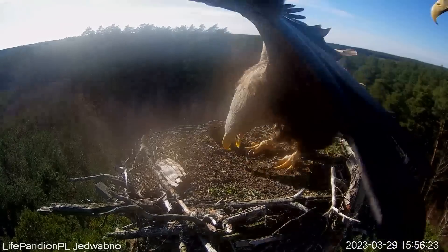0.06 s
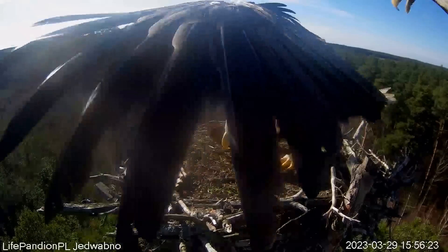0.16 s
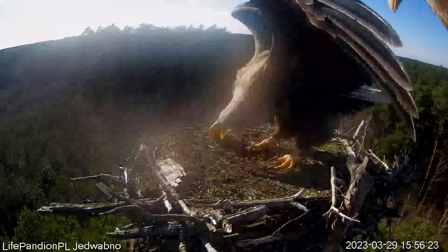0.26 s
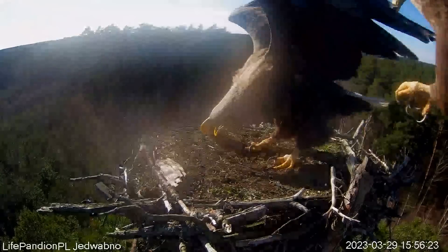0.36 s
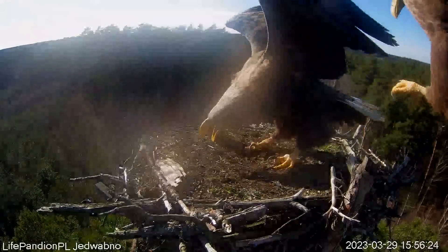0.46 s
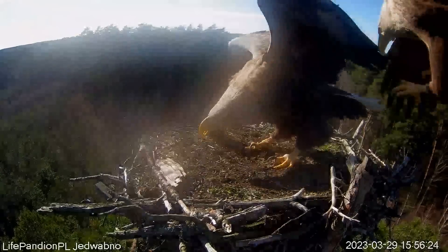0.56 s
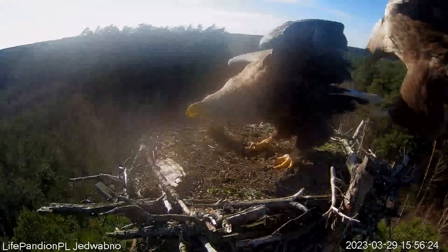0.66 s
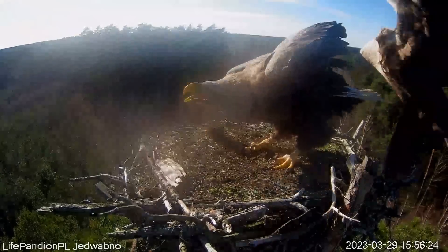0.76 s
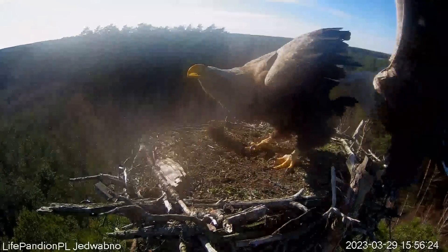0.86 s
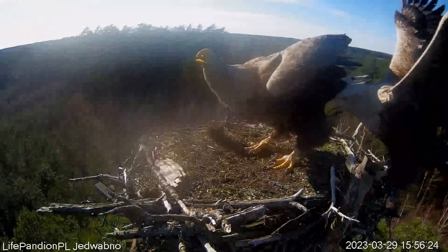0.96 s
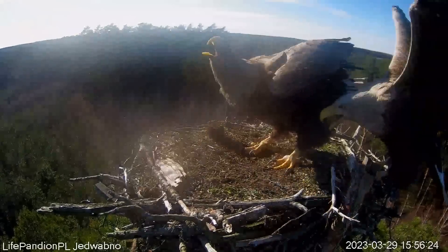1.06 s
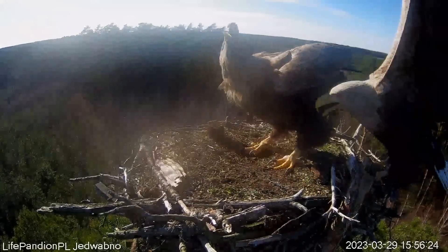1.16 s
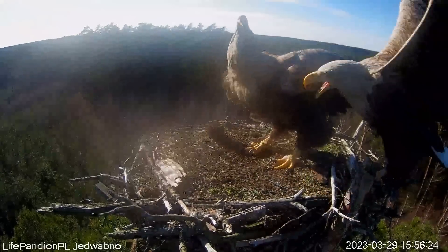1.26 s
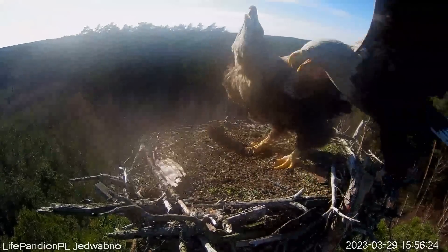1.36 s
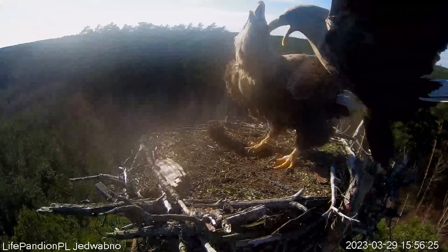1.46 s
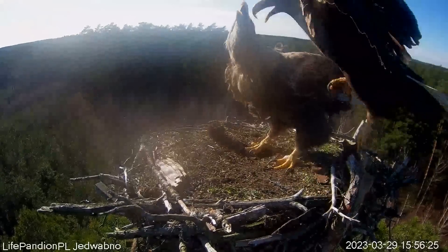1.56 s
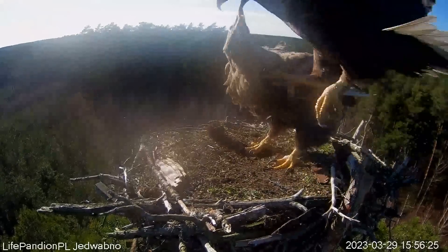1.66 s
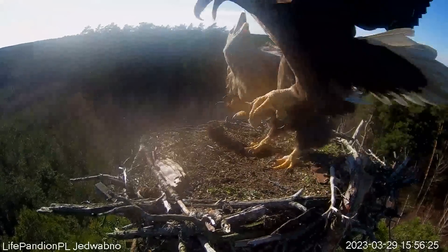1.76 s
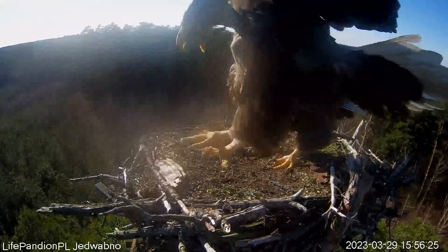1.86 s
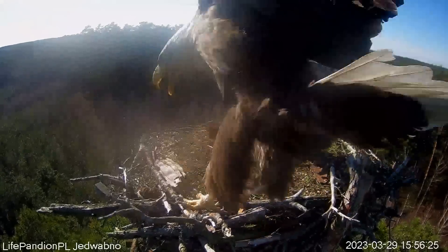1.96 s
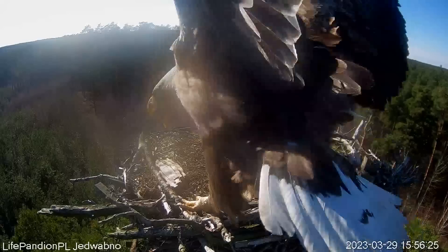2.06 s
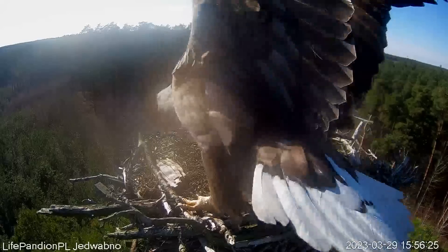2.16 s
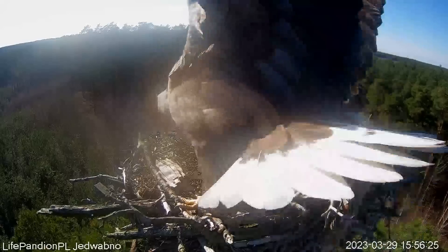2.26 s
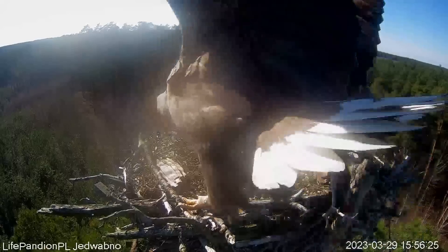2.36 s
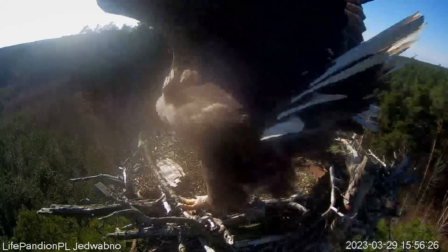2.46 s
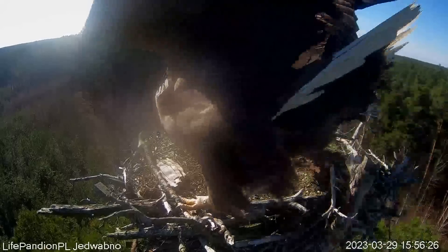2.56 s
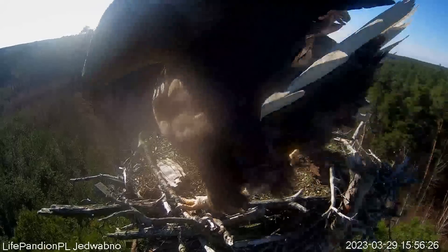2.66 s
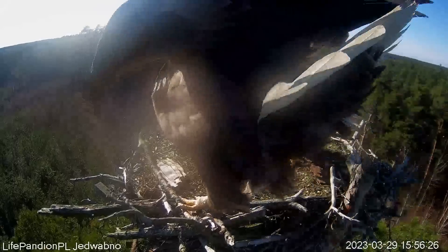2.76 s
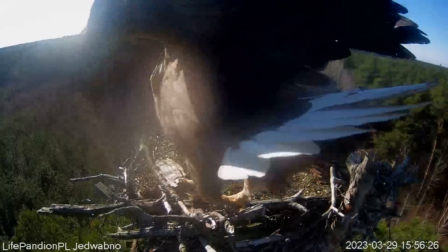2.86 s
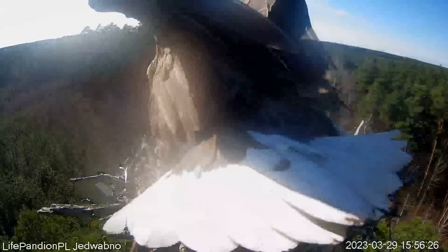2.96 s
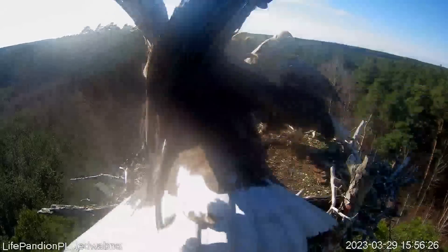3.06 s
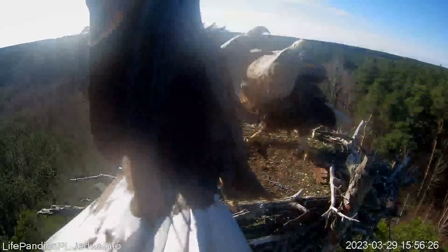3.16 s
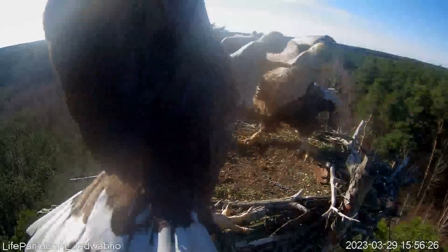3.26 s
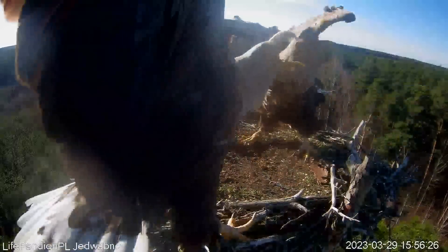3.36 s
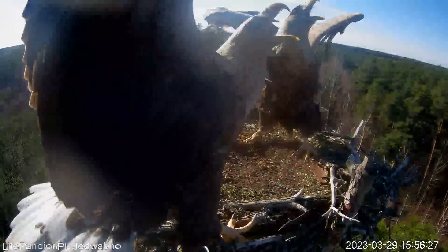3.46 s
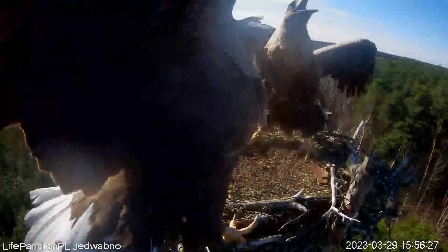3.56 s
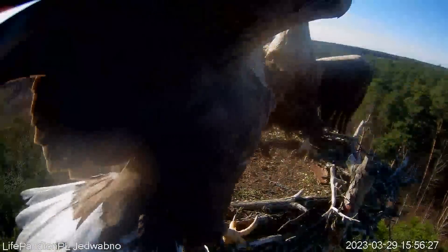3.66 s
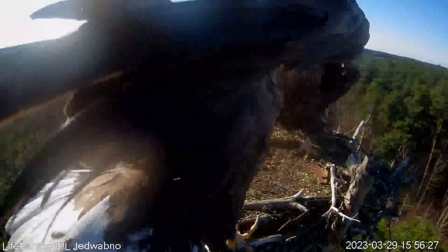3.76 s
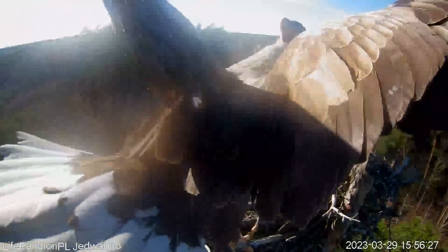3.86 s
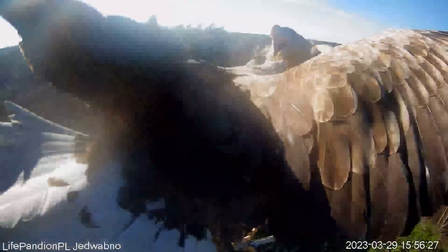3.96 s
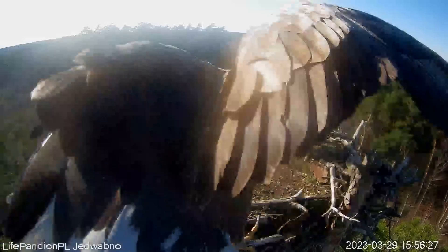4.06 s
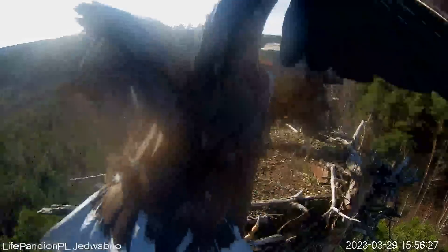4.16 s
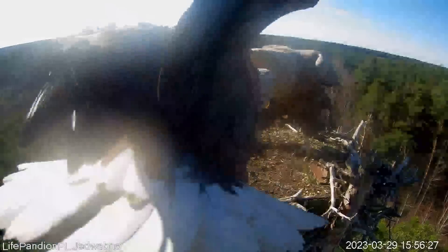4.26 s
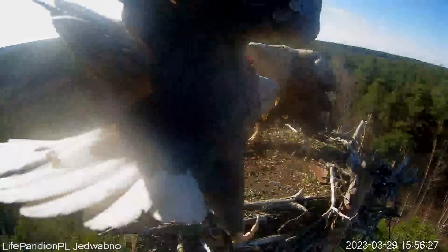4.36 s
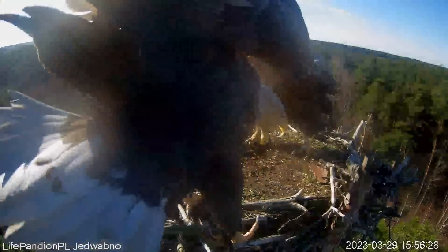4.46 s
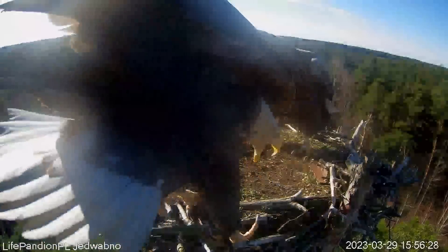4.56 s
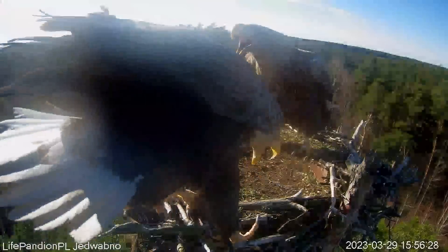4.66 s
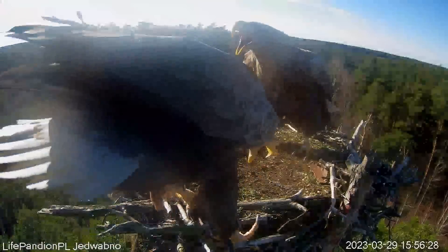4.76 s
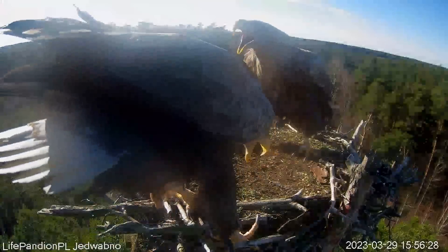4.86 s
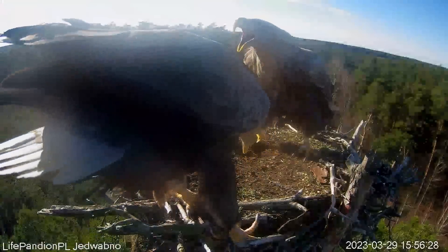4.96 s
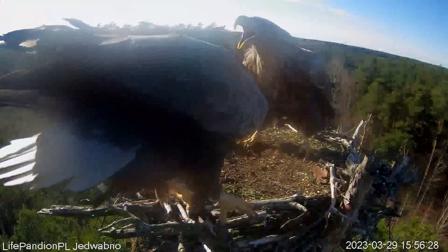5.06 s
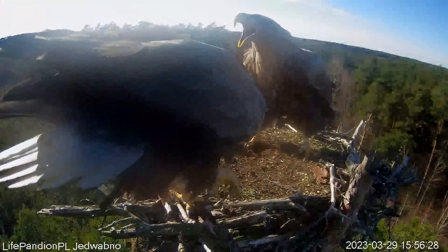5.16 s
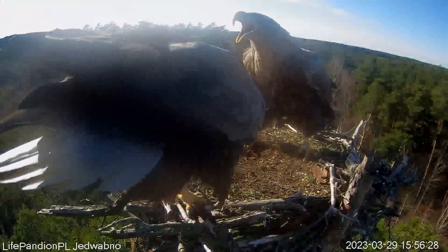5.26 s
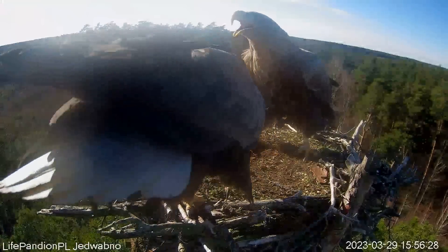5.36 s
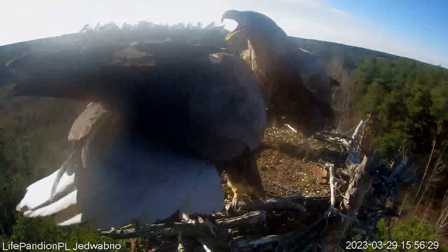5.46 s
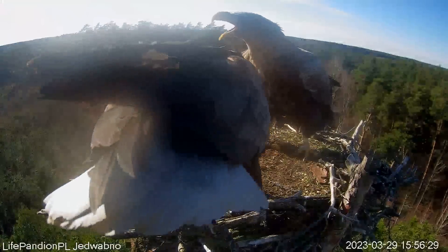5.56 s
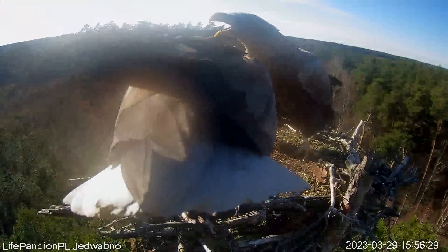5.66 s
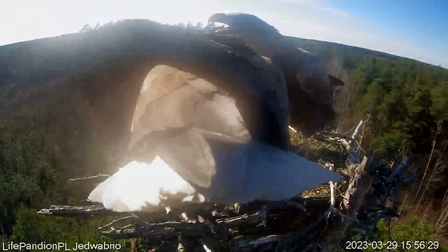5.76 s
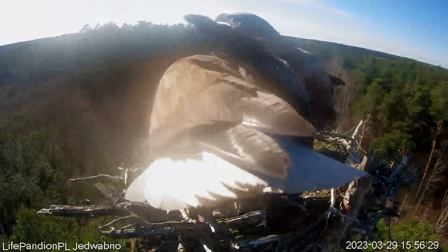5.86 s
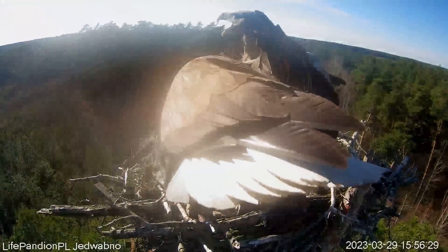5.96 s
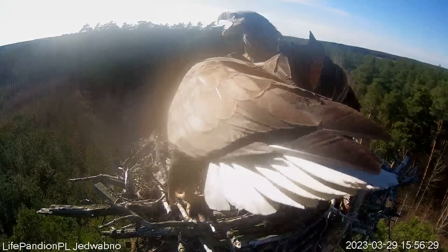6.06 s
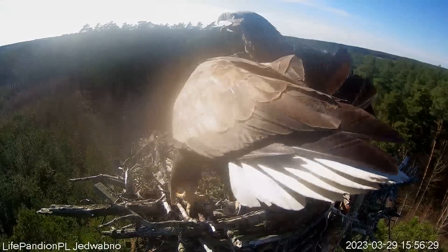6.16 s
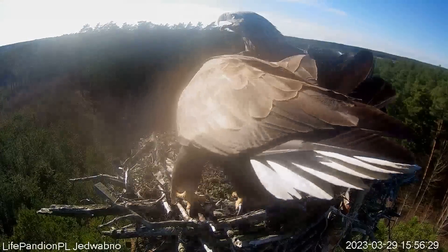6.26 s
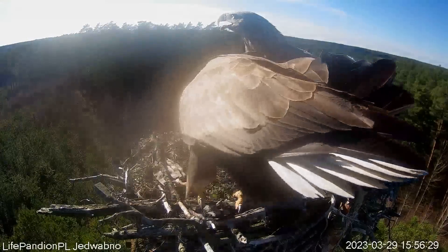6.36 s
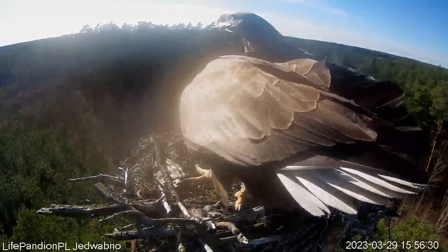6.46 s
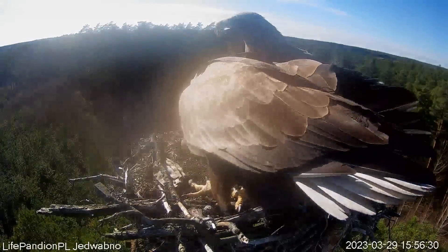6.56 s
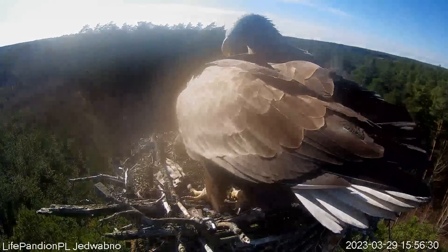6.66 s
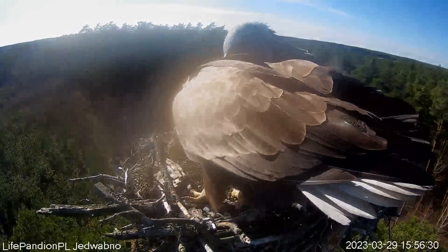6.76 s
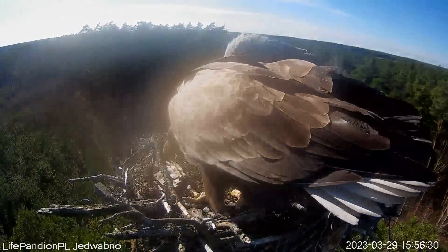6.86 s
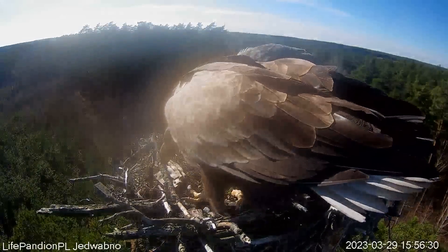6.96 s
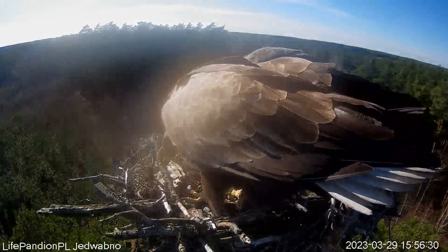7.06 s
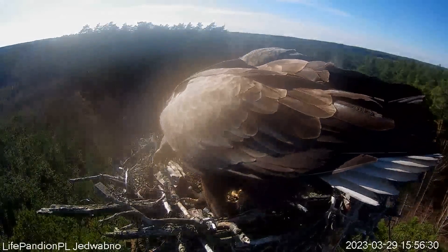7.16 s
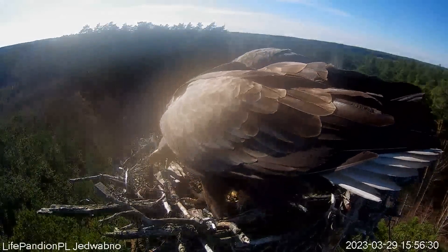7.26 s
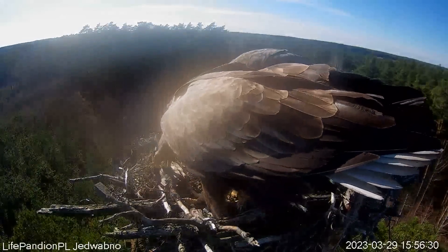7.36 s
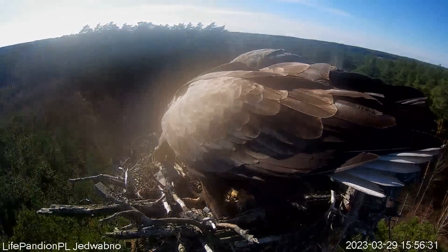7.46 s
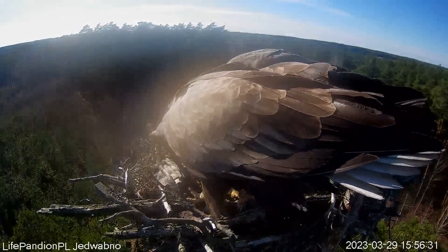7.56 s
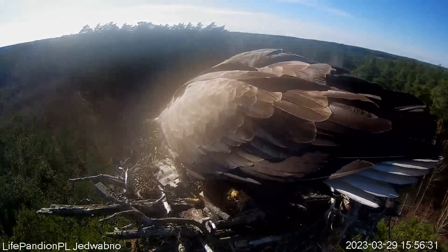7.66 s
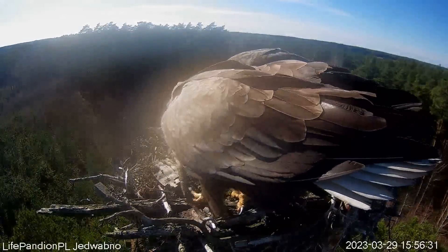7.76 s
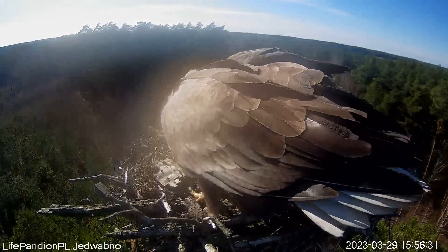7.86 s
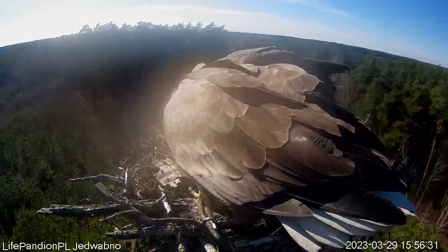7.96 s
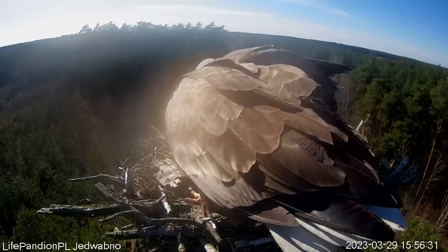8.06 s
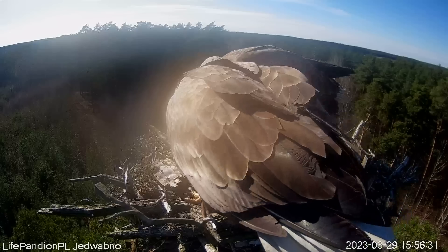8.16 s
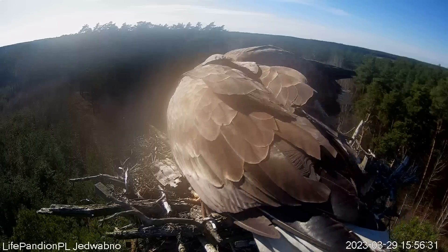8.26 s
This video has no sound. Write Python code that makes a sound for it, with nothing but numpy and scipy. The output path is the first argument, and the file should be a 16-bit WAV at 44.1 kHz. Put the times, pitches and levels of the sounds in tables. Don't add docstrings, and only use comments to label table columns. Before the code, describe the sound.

Close, harsh and slightly overloaded yelping from two large birds of prey, outdoors high above a forest. Arched cries repeat about five times a second, interleaved with higher notes that crack upward, throat rattles and hard bill snaps. Low puffs of air buffet the microphone, twigs knock its mount and feathers brush nearby. Faint echoes return from the trees; the calling then stops, leaving sparse, gentle cries and dwindling wind.

```python
import sys
import numpy as np
from scipy import signal
from scipy.io import wavfile
from scipy.ndimage import uniform_filter1d

SR = 44100
rng = np.random.default_rng(int(sys.argv[2]) if len(sys.argv) > 2 else 0)


def generate_wav(sig):
    pcm = np.round(np.clip(np.atleast_2d(sig).T, -1, 1) * 32767).astype(np.int16)
    wavfile.write(sys.argv[1], SR, pcm)


def magnitude_from_level(level_db):
    exponent = np.asarray(level_db, float) / 20
    return 10 ** exponent


N = 365588


def band(x, lo_hz, hi_hz, order=2):
    return signal.sosfilt(signal.butter(order, [lo_hz, hi_hz], "band", fs=SR, output="sos"), x)


def unit(x):
    return x / np.sqrt(np.mean(x ** 2))


def walk(rate, size=N):
    k = int(SR / rate)
    held = np.repeat(rng.standard_normal(size // k + 1), k)
    return 1.64 * uniform_filter1d(uniform_filter1d(held, k), k)[:size]


def add(out, s, x):
    i = int(s * SR)
    out[i:i + len(x)] += x[:N - i]


def spans(table, edge_s):
    gain = np.zeros(N)
    for t0, t1, db in table:
        gain[int(t0 * SR):int(t1 * SR)] = magnitude_from_level(db)
    return uniform_filter1d(gain, int(edge_s * SR))


# (frequency [Hz], level [dB])
THROAT_COLOUR = [(500, -23.5), (1200, -1.5), (2400, 1), (3600, -3.5), (5000, -6.5), (7500, -4)]


def syrinx(hz, level_db, open_db, half_db, unrest, wobble=.006, shimmer_db=0.6):
    size = len(hz)
    peak_db = np.max(level_db)
    drive = peak_db / 10 + 2
    kink = .008 * np.clip(drive, .2, 1)
    drift = unrest * wobble * walk(300, size=size) + kink * walk(100, size=size)
    phase = 2 * np.pi * np.cumsum(hz * (1 + drift)) / SR
    order = np.arange(1, 15)[:, None] / 2

    slope_db = 0.084 * open_db + 0.21 * level_db - 5.5
    db = np.where(order <= 2, open_db * (order - 1), open_db + (order - 2) * slope_db)
    db = np.where(order % 1 > 0, half_db + np.minimum(db, 0) * (order > 1), db)
    sway = np.array([walk(150, size=size) for _ in order])
    db = db + 1.7 * (np.clip(order, 1, 5) - .6) * sway
    db = db - .25 * np.maximum(order - 2, 0) * (peak_db - level_db)
    throat_hz, throat_db = np.transpose(THROAT_COLOUR)
    gain = magnitude_from_level(db + np.interp(np.log(order * hz), np.log(throat_hz), throat_db))
    gain = gain * (order * hz < 9000)

    lag = np.pi / 4 * np.clip(drive, 0, 1) * order ** 2
    lag = lag + .09 * np.minimum(unrest, 3) * np.maximum(order - 2.5, 0) * walk(1200, size=size)
    tone = -np.sum(gain * np.cos(order * phase + lag), axis=0)
    tone = tone / np.sqrt(np.sum(gain ** 2, axis=0) / 2)
    shimmer = 0.4 * walk(90, size=size) - shimmer_db * unrest * np.abs(walk(250, size=size))
    tone = tone * magnitude_from_level(level_db + shimmer)

    hoarse_db = -19.5 + 1.6 * np.maximum(level_db, -20) + 6 * walk(200, size=size)
    shake = np.minimum(magnitude_from_level(hoarse_db) * unrest, .7) * walk(2500, size=size)
    return tone + band(tone * shake, 1100, 5000, order=3)


LEAD_S, RELEASE_S = .006, .008
# (time inside the note [s], level of half-pitch partials [dB])
DOUBLED_NOTES = [
    (1.11, -10),
    (1.34, -27),
    (5.31, -12),
    (5.83, -9.5),
    (7.19, -29),
    (7.5, 8.5),
]


def sing(s, hz, swell_db, level_db, open_db):
    lead = int(LEAD_S * SR)
    hz, swell_db, open_db = (np.pad(v + 0 * hz, (lead, 0), mode="edge") for v in (hz, swell_db, open_db))
    t = np.arange(len(hz)) / SR
    left = t[-1] - t
    half_db = max([d for at, d in DOUBLED_NOTES if s < at < s + t[-1]], default=-45)
    attack = np.clip(1 - t / 0.017, 0, 1) ** 1.5
    release = np.clip(1 - left / RELEASE_S, 0, 1) ** 2
    swell_db = swell_db - 29.5 * (attack + release)
    fade = np.clip(np.minimum(t / 2, left) / .003, 0, 1)
    strain = .75 + 1.8 * np.exp(-((s - 3.9) / 1.0) ** 2)
    unrest = strain + 5 * np.exp(-((t - LEAD_S) / .018) ** 2) - .15 * swell_db
    half_db = np.maximum(half_db, np.minimum(-50 + 6 * unrest, -10))
    voice = fade * syrinx(hz, level_db + swell_db, open_db, half_db, unrest)
    return max(s - LEAD_S, 0), voice[max(lead - int(s * SR), 0):]


def bill_opening(hz):
    return 2 - 18 * np.maximum(hz - 1300, 0) / 1000


# (start [s], length [s], pitch from [Hz], pitch to [Hz], level [dB])
ONE_REGISTER_GLIDES = [(0, 0.03, 1273, 1163, -6.5), (1.095, 0.04, 1078, 1150, -14),
                       (2.631, 0.038, 1690, 1670, -20.5), (2.832, 0.039, 1775, 1750, -17),
                       (3.053, 0.047, 1790, 1800, -12), (3.236, 0.047, 1190, 1215, -14),
                       (3.274, .052, 1720, 1810, -5), (3.473, .062, 1543, 1985, -2.5),
                       (4.286, 0.055, 1730, 1960, -9), (4.496, .026, 1361, 1385, -9.5),
                       (4.505, 0.037, 1861, 1800, -12.5), (4.758, 0.043, 1860, 1870, -16.5),
                       (4.999, 0.045, 1292, 1390, -16.5), (5.28, .055, 1077, 1170, -26),
                       (5.796, .06, 1086, 1180, -25.5)]
# (start [s], climb [s], hold [s], upper pitch [Hz], level [dB])
UPWARD_BREAKS = [
    (0.026, 0.036, .024, 1807, -6.5),
    (1.486, 0.035, .028, 1766, -10.5),
    (1.712, 0.026, .042, 1845, -6),
    (1.928, .032, .024, 1900, -5.5),
    (2.155, 0.018, .018, 1824, -10.5),
    (2.373, 0.021, .022, 1736, -12.5),
    (3.662, .028, .032, 2002, -10.5),
    (3.867, 0.016, .036, 2063, -8),
    (4.07, 0.023, .034, 2026, -10),
]


def second_bird():
    out = np.zeros(N)
    climb_hz_per_s, jump_hz, upper_sag_hz_per_s = 8000, 400, 2000
    for s, length, lo_hz, hi_hz, db in ONE_REGISTER_GLIDES:
        hz = np.linspace(lo_hz, hi_hz, int(length * SR))
        add(out, *sing(s, hz, 0, db, bill_opening(hz)))
    for s, climb, hold, hz, db in UPWARD_BREAKS:
        t = np.arange(-climb, hold, 1 / SR)
        pitch = hz + np.where(t < 0, climb_hz_per_s * t - jump_hz, upper_sag_hz_per_s * (hold / 2 - t))
        dip_db = -2.5 * np.exp(-(t / .0015) ** 2)
        swell_db = dip_db - 0.5 * np.clip(t / hold, 0, 1) ** 2
        open_db = uniform_filter1d(np.where(t < 0, 0.5, bill_opening(pitch)), size=40)
        pitch = uniform_filter1d(pitch, size=20, mode="nearest")
        add(out, *sing(s, pitch, swell_db, db, open_db))
    return out


def treetops(voice):
    t = np.arange(int(.5 * SR)) / SR
    near = magnitude_from_level(-48) * np.exp(-t / .007) + magnitude_from_level(-76) * np.exp(-t / .022)
    crown = magnitude_from_level(-74) * np.exp(-((t - .11) / .015) ** 2)
    far = magnitude_from_level(-95) * np.exp(-t / .15)
    scatter = rng.standard_normal(len(t))
    scatter = scatter + magnitude_from_level(-4) * unit(band(scatter, 3300, 4100))
    ducked = 1 / (1 + 70 * uniform_filter1d(np.abs(voice), SR // 2))
    rim_echo = signal.fftconvolve(voice, scatter * near)[:N]
    forest_echo = signal.fftconvolve(voice, scatter * (crown + far))[:N]
    return rim_echo + ducked * forest_echo


# (time [s], level [dB])
LULL_LEVEL = [(0, -49.5), (.6, -47), (3.0, -47.5), (5.0, -49), (5.7, -54.5), (6.7, -61.5), (7.5, -55),
              (8.3, -63.5)]
# (time [s], half length [s], level [dB])
PUFFS = [(.11, 0.028, -36), (0.203, 0.024, -21), (.29, 0.028, -13.5), (.38, 0.028, -35.5),
         (.82, 0.024, -40), (.99, 0.029, -30.5), (1.1, 0.093, -31.5), (1.32, 0.028, -41), (1.47, .045, -26),
         (1.57, 0.059, -35.5), (1.83, .035, -32), (2.05, .055, -37), (2.38, 0.033, -32.5),
         (2.48, 0.055, -42), (2.6, 0.03, -33), (2.81, .03, -37), (3.02, 0.027, -39), (3.3, .022, -40.5),
         (3.55, .055, -25), (3.7, .055, -29.5), (4.15, 0.035, -21), (4.39, 0.069, -32.5), (4.6, .03, -29.5),
         (4.99, .022, -36), (5.13, 0.024, -35.5), (5.41, 0.016, -27.5), (5.51, .022, -40.5),
         (5.83, 0.0074, -27), (6.07, .022, -41), (7.47, 0.042, -32.5)]
# (time [s], level [dB])
CALM_EDDIES = [(2.724, -35), (4.331, -32), (4.469, -35.5), (5.659, -42), (5.75, -49), (6.26, -47.5),
               (6.35, -58.5), (6.44, -47), (6.979, -43), (7.17, -43), (7.25, -42.5), (7.39, -41),
               (7.62, -37.5), (7.77, -52.5), (7.92, -53), (8.22, -52)]


def wind():
    t = np.arange(0, N, 64) / SR
    lull_db = np.interp(t, *np.transpose(LULL_LEVEL)) + 1.2 * walk(21)[::64]
    power = magnitude_from_level(2 * lull_db)
    for s, half, db in [*PUFFS] + [(s, 0.015, db) for s, db in CALM_EDDIES]:
        power = power + magnitude_from_level(2 * db) * np.exp(-((t - s) / half) ** 2)
    gust_db = np.interp(np.arange(N) / SR, t, 10 * np.log10(power))
    surge, out = 0.68 * walk(30), 0
    for octave in range(5):
        hz = 36 * 2. ** octave
        eddy = unit(band(rng.standard_normal(N), hz / np.sqrt(2), hz * np.sqrt(2)))
        slope_db = 2.5 + 0.066 * (gust_db + 40.5) - 1.383 * octave
        flicker = np.clip(5.0 * walk(22), -12, 5)
        out = out + eddy * magnitude_from_level(gust_db - 10.5 + octave * slope_db + surge + flicker)
    return out


# (from [s], to [s], level [dB])
FEATHER_RUBS = [(.1, .15, -43), (.41, .43, -48), (.55, .63, -59.5), (.69, .8, -53), (.88, 1.0, -66),
                (2.025, 2.04, -56), (2.22, 2.25, -57.5), (3.37, 3.43, -56.5), (3.563, 3.605, -33),
                (5.1, 5.12, -56), (5.39, 5.43, -54), (6.4, 6.42, -66), (6.64, 6.66, -71.5),
                (7.85, 7.87, -52.5), (8.07, 8.09, -66.5)]


def feathers():
    scratch = rng.standard_normal(N) * magnitude_from_level(4 * walk(300) + 4 * walk(60))
    hiss = magnitude_from_level(-78.0) * unit(band(rng.standard_normal(N), 500, 4900, order=1))
    return unit(band(scratch, 900, 7000, order=1)) * spans(FEATHER_RUBS, 1 / 80) + hiss


# (time [s], peak level [dB], pitch [Hz])
MOUNT_KNOCKS = [(0.206, -18.5, 111.3), (0.716, -42.5, 616), (3.592, -10, 532), (3.564, -24.5, 147),
                (3.629, -19.5, 262), (3.647, -16.5, 400), (3.691, -19.5, 228), (3.73, -13.5, 330),
                (4.185, -16, 215.6), (4.586, -20.5, 212.6), (3.388, -36.5, 550), (5.388, -15, 325.2),
                (5.402, -11.5, 180.5), (5.414, -26.5, 142.5), (5.419, -21.5, 190), (7.386, -34, 307.7),
                (7.438, -35, 260), (7.446, -37, 200.2)]


def knocks():
    out = np.zeros(N)
    for s, db, hz in MOUNT_KNOCKS:
        cycles = np.arange(int(6 * SR / hz)) * hz / SR
        push = (1 - np.exp(-cycles / 0.3)) ** 2 * np.exp(-cycles / 1.1)
        add(out, s, 3.08 * magnitude_from_level(db) * np.sin(2 * np.pi * cycles ** .9) * push)
    return out


# (start [s], climb [s], sag [s], crest [Hz], bill opening [dB])
ROUND_CRIES = [
    (1.862, .05, .04, 1623, -1),
    (2.082, .042, .046, 1594, -11),
    (2.292, 0.048, .034, 1584, -13.5),
    (3.445, 0.043, .046, 1540, -7),
    (3.667, 0.046, 0.029, 1536, -8.5),
    (3.878, .04, 0.032, 1523, -3),
    (4.078, .04, 0.033, 1507, -4),
    (4.72, 0.046, 0.024, 1533, -1.5),
    (4.932, .04, 0.035, 1522, -2),
    (5.51, 0.052, 0.03, 1436, -6.5),
]
STEPPED_CRIES = [
    (0.45, 0.031, 0.031, 1524, -7),
    (2.525, 0.029, .042, 1602, -10.5),
    (2.762, 0.036, .044, 1601, -14.5),
    (3.006, 0.028, .052, 1564, -3.5),
    (3.227, 0.033, .058, 1538, 2.5),
    (4.297, .038, 0.032, 1525, -12.5),
    (4.521, 0.019, 0.037, 1510, -4.5),
    (5.165, 0.032, 0.041, 1535, 0),
]
# (time [s], level [dB])
CRY_EFFORT = [(.4, -9.5), (1.9, -9), (2.2, -10.5), (2.7, -7), (3.2, -10.5), (3.5, -7), (5.2, -6.5),
              (5.6, -7.5)]
# (start [s], length [s], level [dB])
FALLING_TAILS = [
    (2.374, 0.017, -12.5),
    (2.595, 0.034, -21),
    (2.836, 0.044, -24),
    (3.091, 0.022, -16.5),
    (4.151, 0.03, -24),
    (4.361, 0.024, -29),
    (4.796, 0.028, -21.5),
    (4.991, 0.059, -24.5),
    (5.241, 0.035, -20.5),
    (5.594, 0.044, -24),
]
# (start [s], length [s], crest [Hz], level [dB], bill opening [dB])
SOFT_CRIES = [
    (0.234, 0.06, 1373, -8.5, 0),
    (1.306, 0.057, 1298, -8, -1),
    (6.011, .104, 1065, -19.5, 2),
    (7.131, 0.11, 1239, -17, -5),
    (7.461, 0.083, 1123, -21, -12.5),
]


def first_bird():
    out = np.zeros(N)
    onset_share, shelf_share, end_share = .68, .86, .88
    for stepped, (s, climb, sag, hz, open_db) in (
            [(False, row) for row in ROUND_CRIES] + [(True, row) for row in STEPPED_CRIES]):
        t = np.arange(0, climb + sag + RELEASE_S, 1 / SR)
        up, down = np.clip(t / climb, 0, 1), np.clip((t - climb) / sag, 0, None)
        if stepped:
            rising = onset_share + (shelf_share - onset_share) * up ** 0.65
        else:
            rising = 1 - (1 - onset_share) * (1 - up) ** 2.4
        sagging = 1 - (1 - end_share) * down ** 3.6
        share = uniform_filter1d(np.where(t < climb, rising, sagging), size=200, mode="nearest")
        swell_db = -1.5 * (1 - up) - 1.9 * down ** 2
        effort_db = np.interp(s, *np.transpose(CRY_EFFORT))
        wider_db = 5 * (t < climb) * (1 - .5 * up)
        add(out, *sing(s - .003, hz * share, swell_db, effort_db, open_db + wider_db))
    for s, length, db in FALLING_TAILS:
        u = np.linspace(0, 1, int(length * SR))
        slide_hz = 1004 + (1300 - 1004) * (1 - u) ** 2.0
        falter_db = -9 * np.exp(-((u - .5) / .12) ** 2)
        add(out, *sing(s, slide_hz, falter_db, db, -3))
    for s, length, hz, db, open_db in SOFT_CRIES:
        bow = np.abs(np.linspace(-1, 1, int((length + RELEASE_S) * SR))) ** 2.0
        depth = 0.097 + 1.391 * length
        add(out, *sing(s - .003, hz * (1 - depth * bow), -11 * bow, db, open_db))
    return out


# (from [s], to [s], level [dB])
RATTLE_SPANS = [(.295, .335, -33), (.515, .545, -36), (.834, .88, -35), (1.222, 1.252, -27.5),
                (1.575, 1.665, -33.5), (3.1, 3.13, -44.5), (3.325, 3.345, -26), (3.535, 3.56, -25.5),
                (3.765, 3.78, -38.5), (3.96, 3.985, -35), (4.38, 4.4, -42), (4.595, 4.62, -43)]
# (frequency [Hz], width [Hz], level [dB])
RATTLE_RESONANCES = [(1250, 130, 5.5), (2580, 1500, 0), (3832, 930, -10.5), (5300, 1500, -33)]


def rattles():
    snaps = (rng.random(N) < 350 / SR) * magnitude_from_level(4.0 * rng.standard_normal(N))
    snaps = snaps + .06 * rng.standard_normal(N)
    throat = 0
    for hz, width, db in RATTLE_RESONANCES:
        throat = throat + magnitude_from_level(db) * unit(band(snaps, hz - width / 2, hz + width / 2))
    return unit(band(throat, 1100, 4300)) * magnitude_from_level(3 * walk(120)) * spans(RATTLE_SPANS, 0.0072)


# (time [s], peak level [dB], throat at the snap [Hz])
BILL_CLACKS = [(.307, -12, 1600), (.326, -22.5, 1410), (1.185, -8.5, 2100), (1.203, -16.5, 2254),
               (1.579, -21.5, 2200), (1.586, -20, 2000), (1.605, -19.5, 1900), (3.545, -9.5, 2028),
               (3.758, -8, 1900), (3.957, -6.5, 2139), (4.16, -15.5, 1681), (4.176, -18.5, 1496),
               (4.588, -13, 1619), (4.817, -16, 1900)]


def clacks():
    out = np.zeros(N)
    t = np.arange(int(.03 * SR)) / SR
    for s, db, hz in BILL_CLACKS:
        sag = 0.13 * (1 - np.exp(-t / 0.0035))
        phase = 2 * np.pi * np.cumsum(hz * (1 - sag + 0.021 * walk(1000, size=len(t)))) / SR
        lower = magnitude_from_level(3 * walk(700, size=len(t))) * np.sin(phase)
        upper = magnitude_from_level(5 * walk(900, size=len(t))) * np.sin(1.9 * phase) * np.exp(-t / 0.0062)
        ring = lower + magnitude_from_level(-6) * upper
        add(out, s, magnitude_from_level(db) * ring * (1 - np.exp(-t / .0005)) ** 2 * np.exp(-t / 0.0062))
    return out


# (start [s], length [s], pitch [Hz], level [dB])
CLUCK_BLIPS = [(0.653, 0.0083, 1250, -28.5), (0.661, 0.0093, 1240, -16.5), (0.674, .016, 1290, -28.5),
               (0.816, 0.016, 1944, -14.5), (1.022, 0.01, 1410, -18), (1.033, 0.0096, 1253, -12),
               (1.046, 0.0077, 1670, -17.5), (1.055, 0.011, 1616, -15), (1.178, 0.015, 1870, -18.5),
               (1.2, 0.013, 2290, -18.5), (1.424, 0.011, 1250, -12), (1.43, 0.018, 1250, -12),
               (1.454, 0.0042, 1850, -13), (1.457, 0.011, 1795, -14)]
# (start [s], length [s], pitch from [Hz], pitch to [Hz], level [dB])
AIR_SQUEAKS = [
    (0.795, .025, 6320, 3400, -35),
    (1.068, .012, 5070, 6200, -32),
    (1.159, .016, 6530, 3000, -24.5),
    (1.471, .01, 4640, 5600, -33),
    (1.555, .023, 6950, 4000, -34.5),
]


def clucks():
    out = np.zeros(N)
    rest_hz, slacken = 1100, 0.43
    # half-pitch level dB, unrest, bill opening dB, rasp
    blips = [(s, length, hz, hz + slacken * (rest_hz - hz), db, -20, 8, -2, .35)
             for s, length, hz, db in CLUCK_BLIPS]
    squeaks = [(*row, -50, 5, -40, 1.2) for row in AIR_SQUEAKS]
    for s, length, from_hz, to_hz, db, half_db, unrest, open_db, rasp in blips + squeaks:
        u = np.arange(0, 1.5, 1 / (length * SR))
        hz = from_hz + (to_hz - from_hz) * np.minimum(u, 1) ** 2
        voice = syrinx(hz, db + 4, open_db, half_db, unrest, shimmer_db=.5)
        voice = voice * (1 + rasp * walk(2500, size=len(u))) / np.hypot(1, rasp)
        swell = np.sin(np.pi * (u / 1.5) ** .7) ** 2
        add(out, s, band(voice, 950, max(4500, 1.1 * from_hz)) * swell)
    return out


def scene():
    second = second_bird()
    first = first_bird() + rattles() + clacks() + clucks()
    echoes = treetops(first + magnitude_from_level(3.5) * second)
    return (second + first + echoes + wind() + feathers() + knocks())[None]


def band_limit(x):
    return signal.sosfilt(signal.butter(12, 15740, fs=SR, output="sos"), x)


def record(dry):
    clip, band_hz = .71, 7250
    camera = np.clip(signal.resample_poly(dry, 160, 441, axis=1), -clip, clip)
    back = signal.resample_poly(camera, 441, 160, axis=1)[:, :N]
    narrow = signal.sosfilt(signal.ellip(8, .2, 60, band_hz, fs=SR, output="sos"), back)
    trimmed = np.clip(narrow, -1.04 * clip, 1.04 * clip)
    return band_limit(trimmed)


dry = scene()
out = record(dry)
generate_wav(out)
```